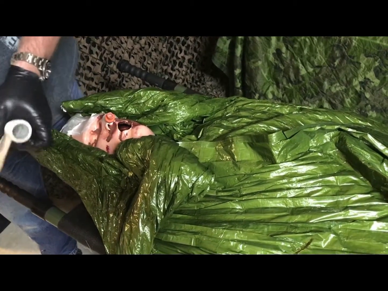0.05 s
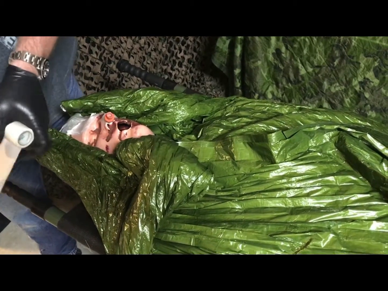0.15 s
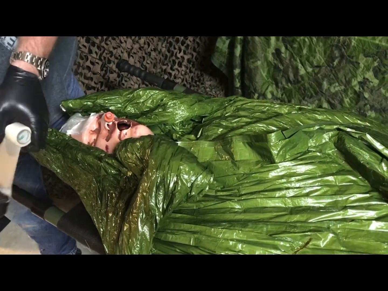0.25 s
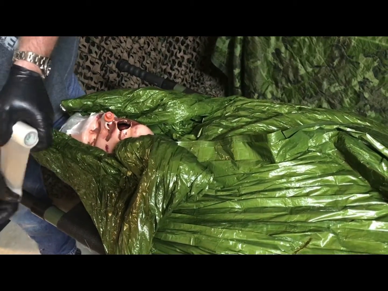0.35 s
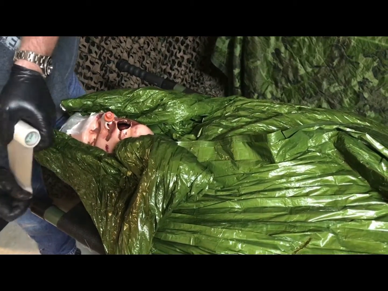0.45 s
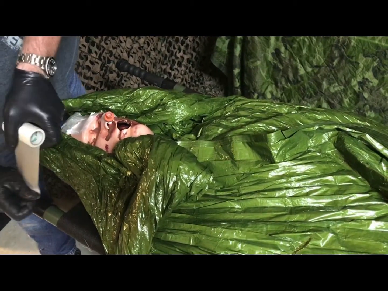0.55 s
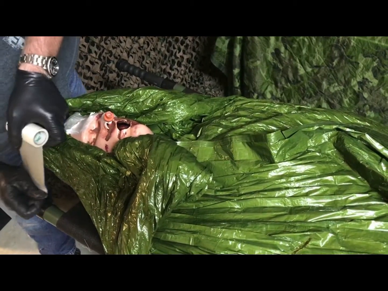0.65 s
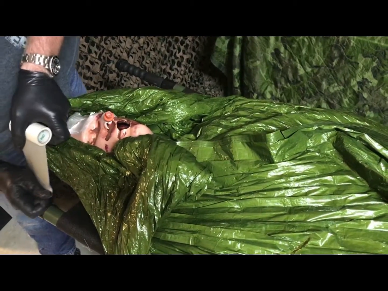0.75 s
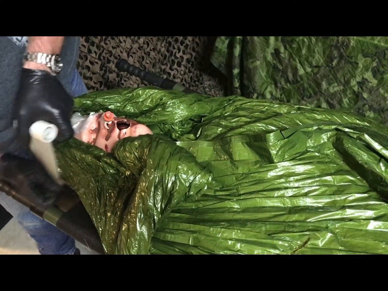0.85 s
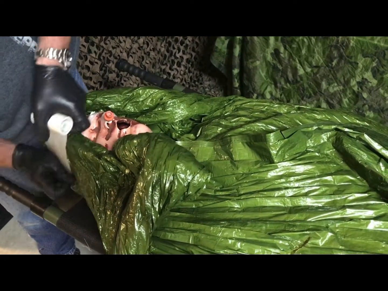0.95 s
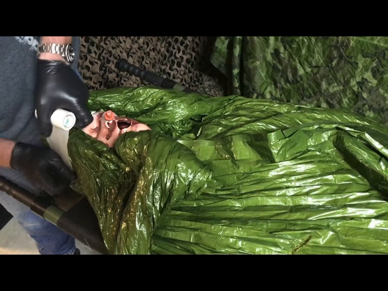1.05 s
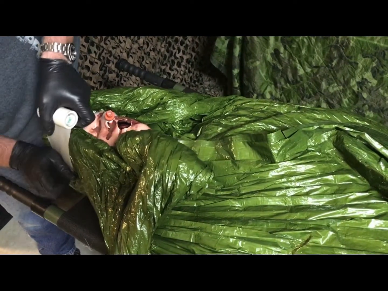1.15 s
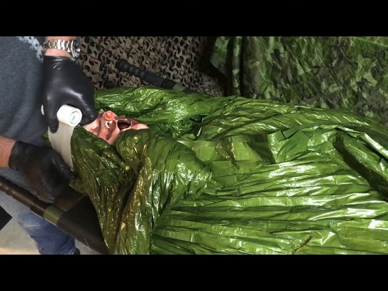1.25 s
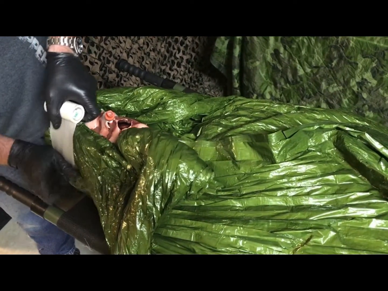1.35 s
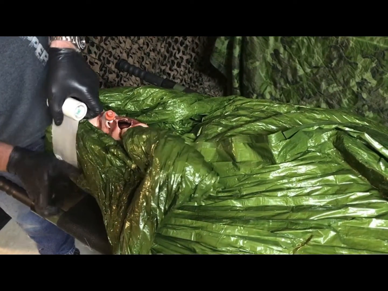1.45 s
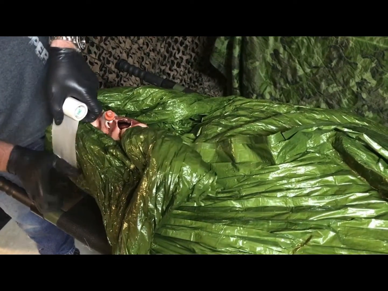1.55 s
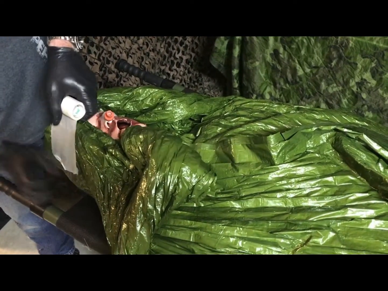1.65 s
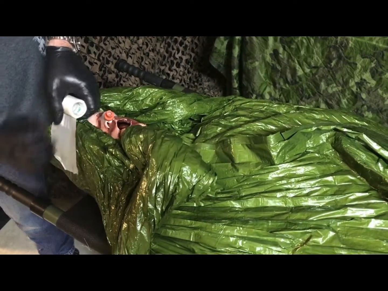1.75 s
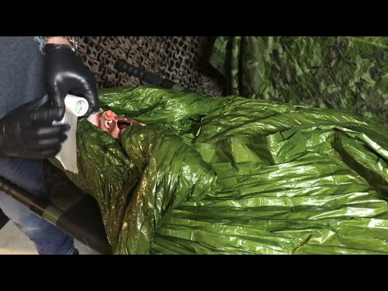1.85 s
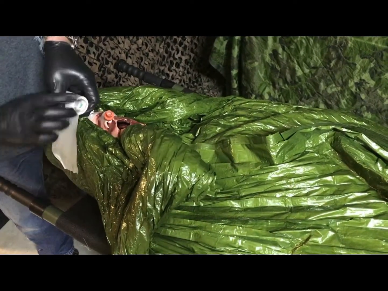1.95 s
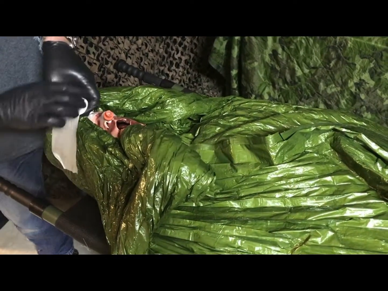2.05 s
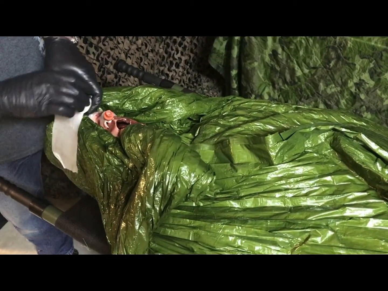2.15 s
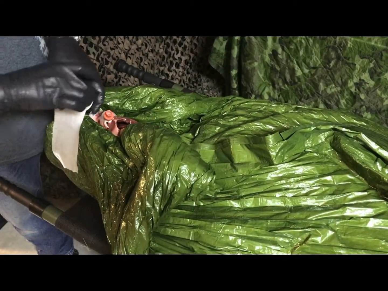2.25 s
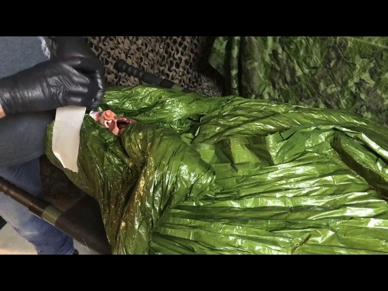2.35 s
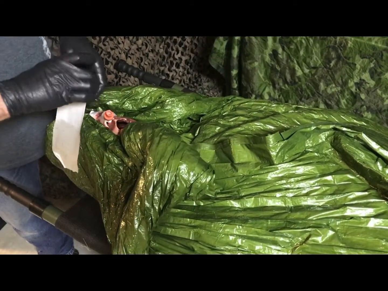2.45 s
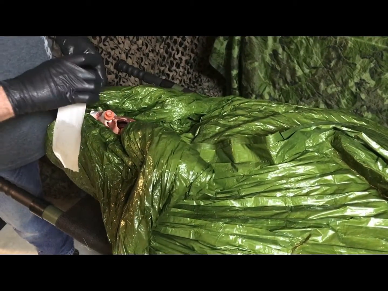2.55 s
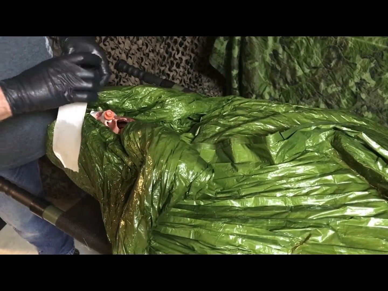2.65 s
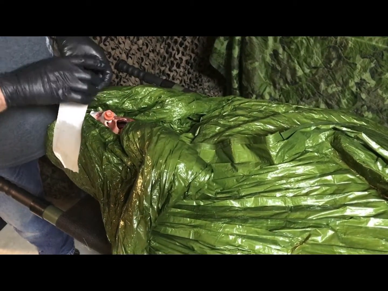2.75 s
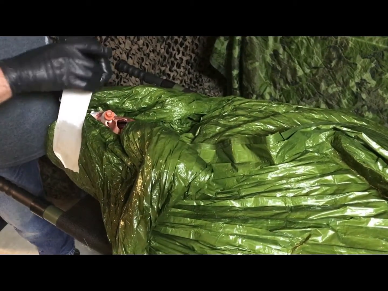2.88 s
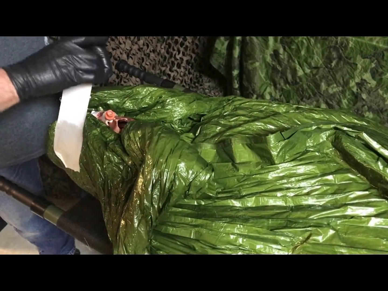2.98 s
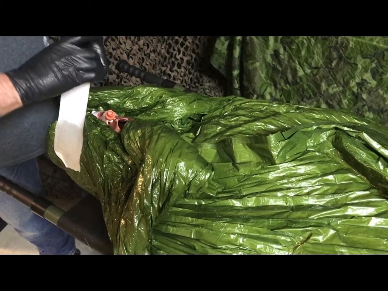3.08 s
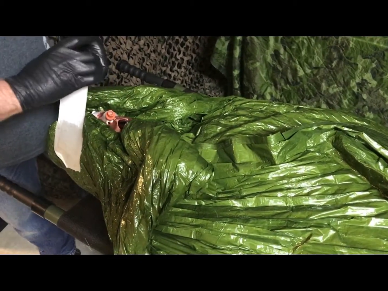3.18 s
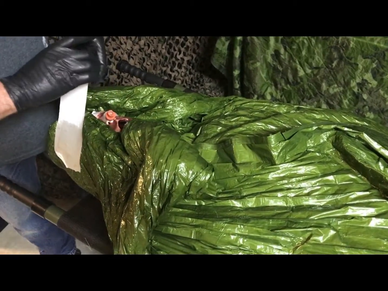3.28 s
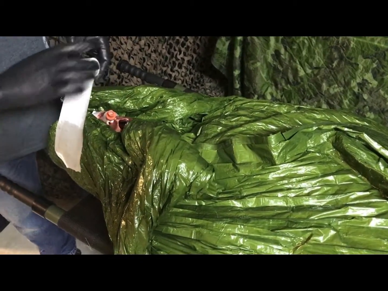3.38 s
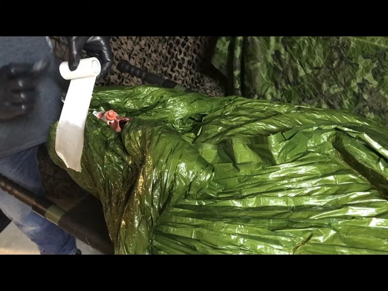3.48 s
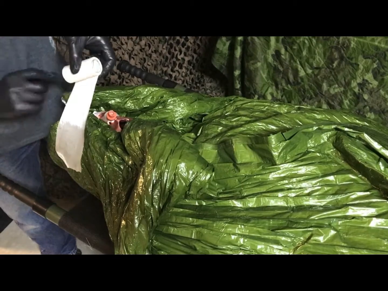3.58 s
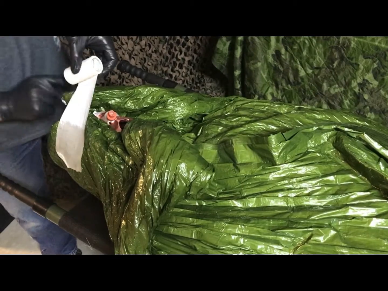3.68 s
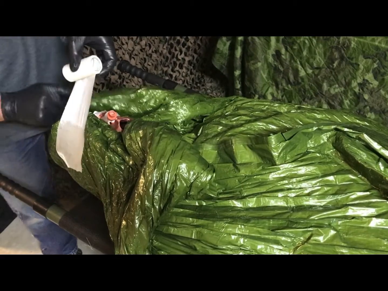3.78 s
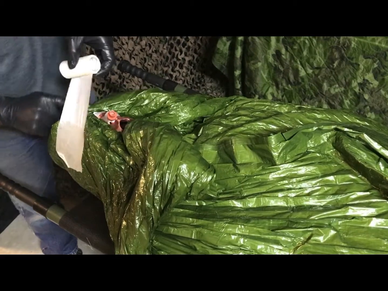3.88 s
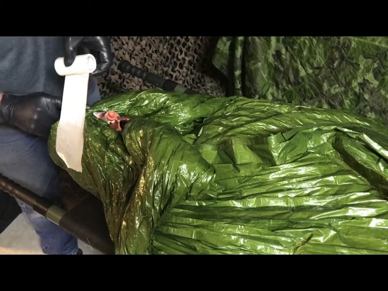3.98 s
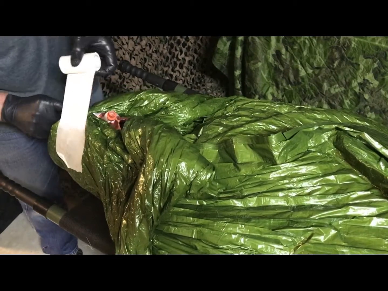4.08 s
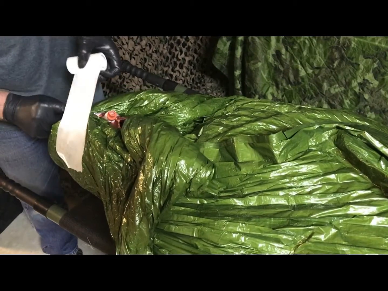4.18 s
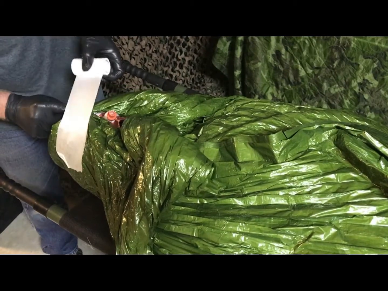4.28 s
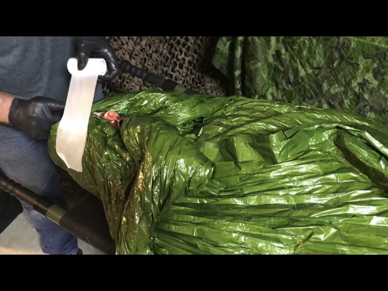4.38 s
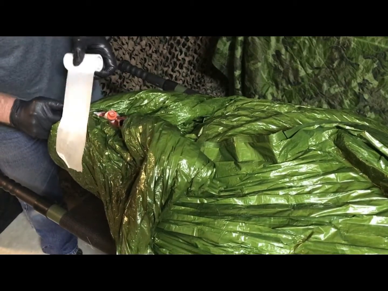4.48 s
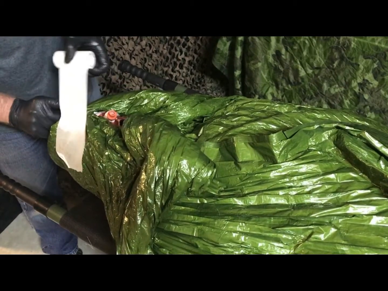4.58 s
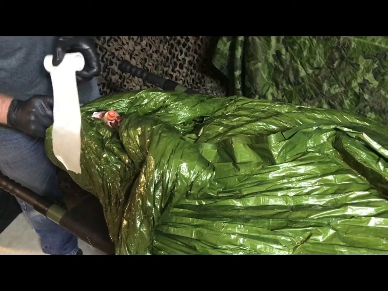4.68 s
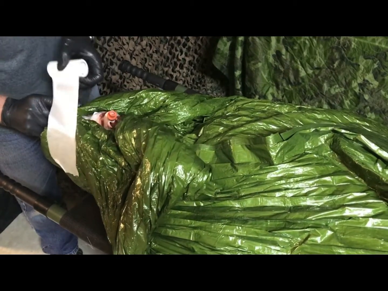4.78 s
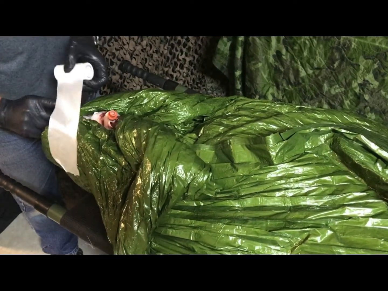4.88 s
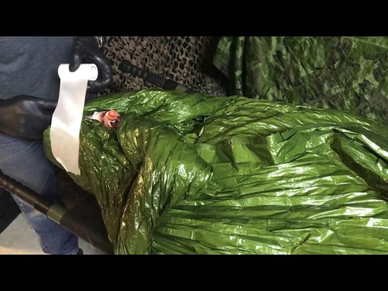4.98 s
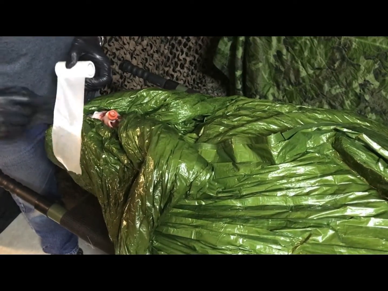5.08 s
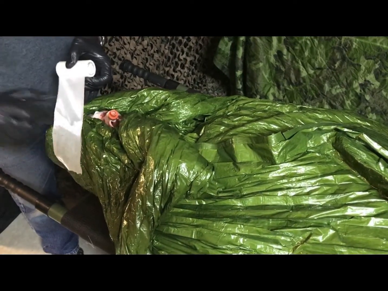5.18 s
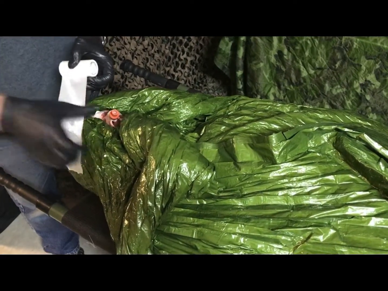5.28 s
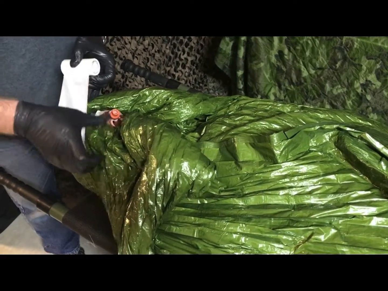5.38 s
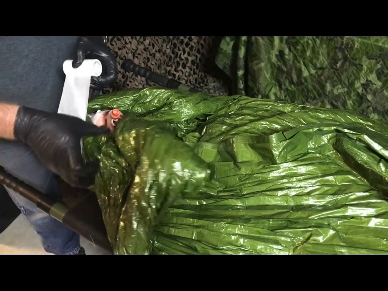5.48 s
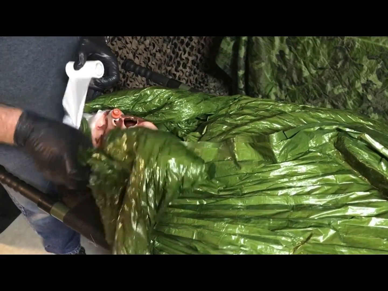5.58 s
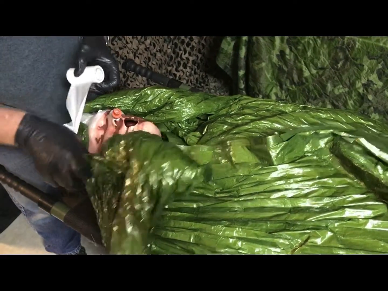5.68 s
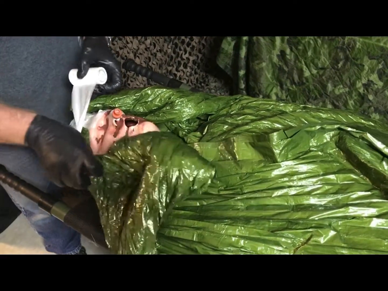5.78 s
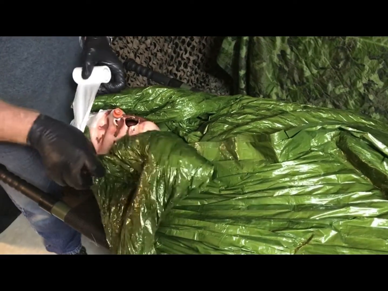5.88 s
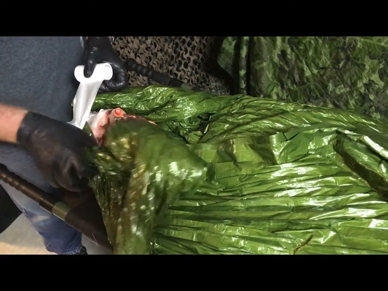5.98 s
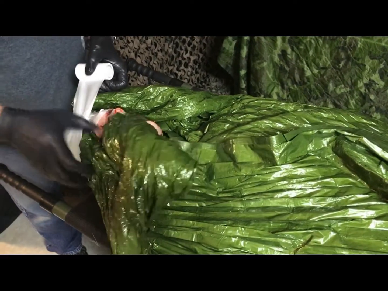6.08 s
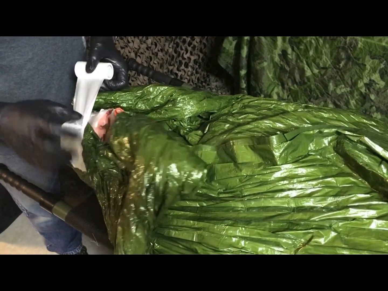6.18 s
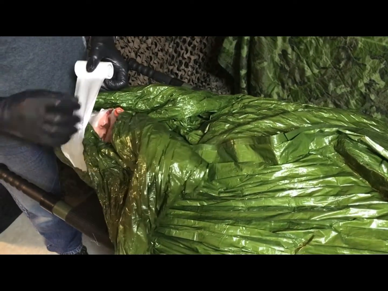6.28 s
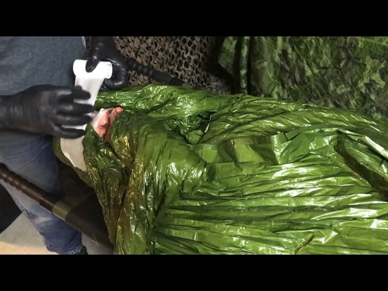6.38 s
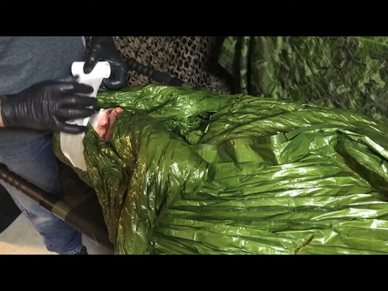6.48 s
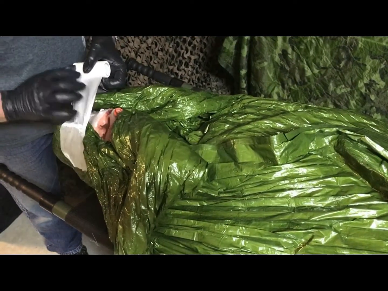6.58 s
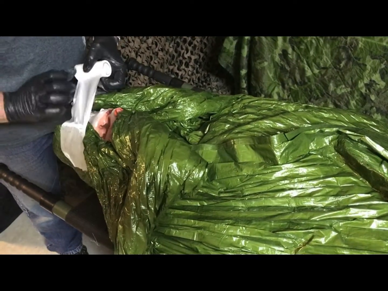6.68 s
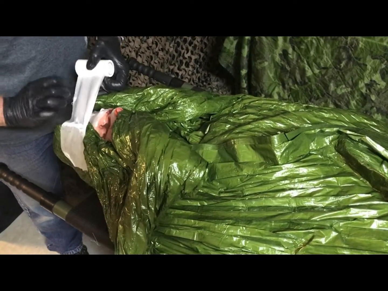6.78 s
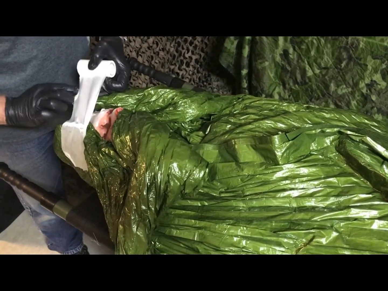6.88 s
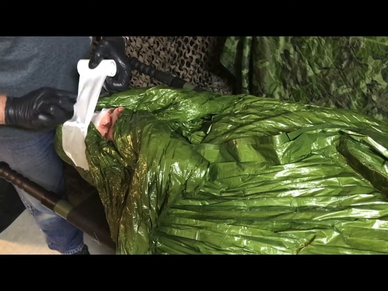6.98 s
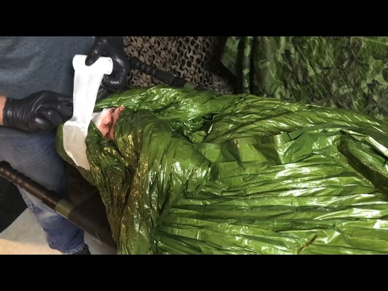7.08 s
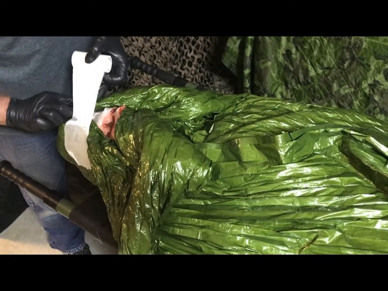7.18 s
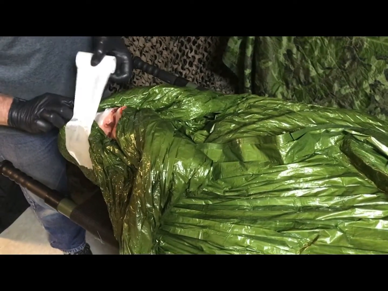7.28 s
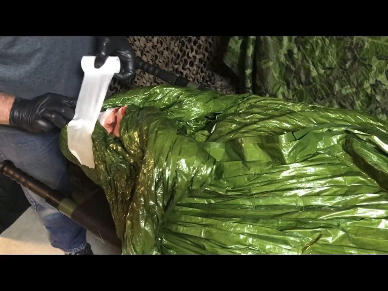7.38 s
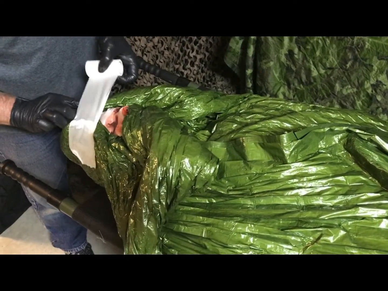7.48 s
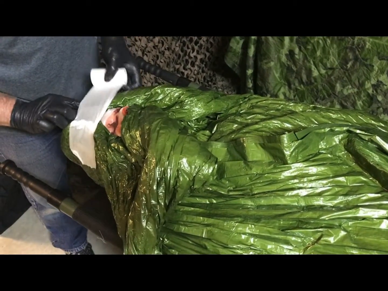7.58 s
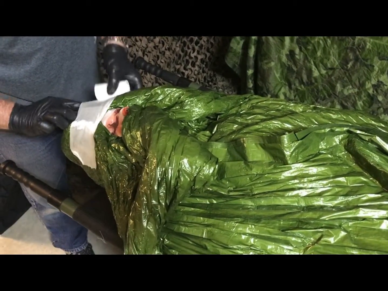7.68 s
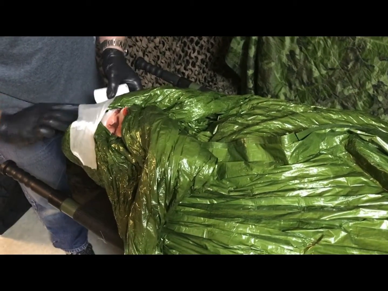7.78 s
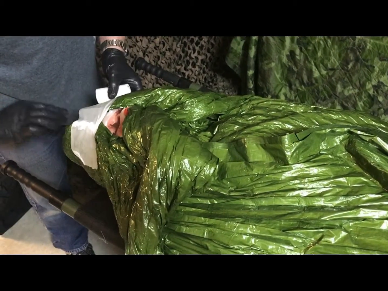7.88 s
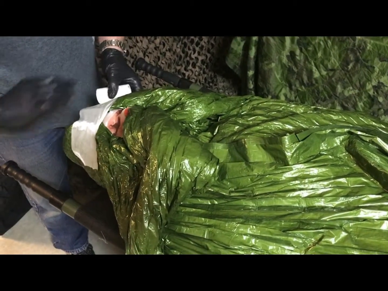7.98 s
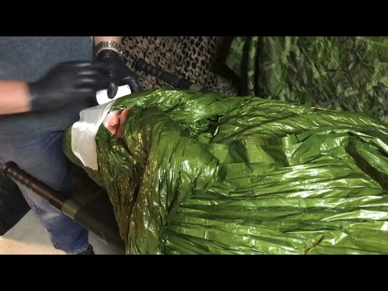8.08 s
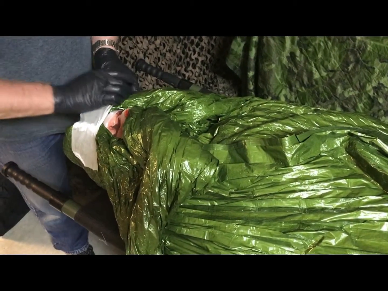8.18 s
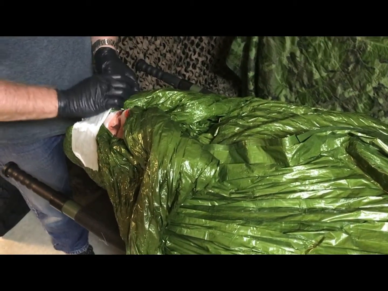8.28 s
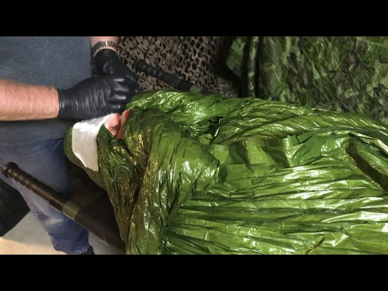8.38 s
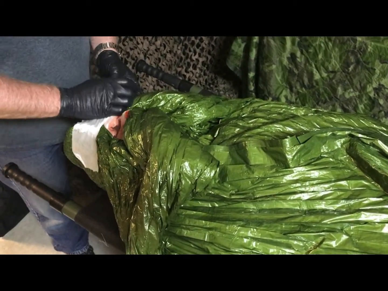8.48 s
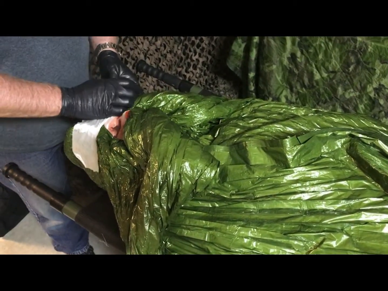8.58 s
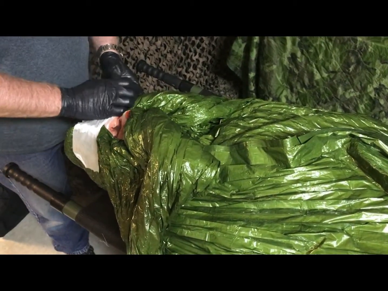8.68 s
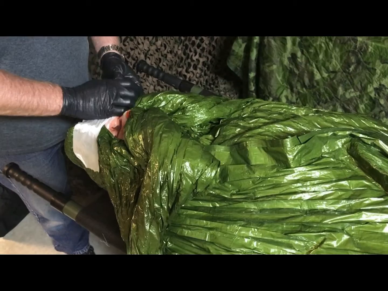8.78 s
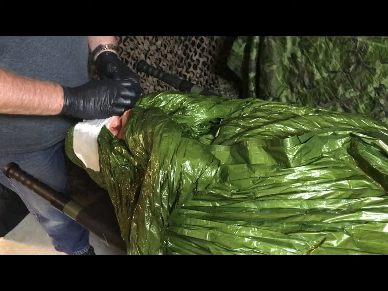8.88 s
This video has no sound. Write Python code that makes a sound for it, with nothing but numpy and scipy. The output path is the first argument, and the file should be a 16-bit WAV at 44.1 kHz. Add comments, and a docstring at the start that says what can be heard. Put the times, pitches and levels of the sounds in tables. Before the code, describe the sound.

Thin plastic sheeting crackles irregularly under gloved hands, recorded close with short indoor reflections. It starts almost quiet, bursts into bright snaps and a soft thump, then eases into small tugs and low glove squeaks. Midway, several panels pop loudly in quick succession. Heavier crinkling, skidding fingers and muffled table knocks come next, then one more hard pop and a sparse, gentle ending.

```python
"""A faint fizz of hands rubbing film opens the scene, with a small snap, then drags, tugs and louder snaps.
Gloved hands wind a bandage round a thin reflective plastic blanket on a training dummy, in a small room.
Random clicks make the fizz, ticks and duller fold rustle; ringing facets make crinkle and papery knocks.
Pulses make the snaps, gliding overtones the glove squeaks, resonant noise the finger skids and dull thumps.
Hollows under the film and the room's reflections ring on, over quiet air."""
import sys
import numpy as np
from scipy import signal
from scipy.fft import rfft, irfft
from scipy.io import wavfile

SR = 44100
rng = np.random.default_rng(int(sys.argv[2]) if len(sys.argv) > 2 else 0)


def output_pcm(signal):
    """Save a mono or channel-first signal as 16-bit PCM at the path in sys.argv[1].

    Samples are clipped to [-1, 1] before scaling.
    """
    pcm = np.clip(np.atleast_2d(signal).T, -1, 1) * 32767
    wavfile.write(sys.argv[1], SR, np.round(pcm).astype(np.int16))


N = 394247
TIME = np.arange(N) / SR

# Quiet air of the room, spectrum: (f/Hz, relative level/dB per Hz)
AIR_SPECTRUM = [(20, -24), (45, 2), (80, 9), (130, 2), (300, -6), (500, -18), (1500, -13.5), (5000, -11.5),
                (16000, -64)]
AIR_DB = -54.5
# Reverberation of the room: (f/Hz, decay by 60 dB t60/s)
ROOM_DECAY = [(100, 0.21), (500, 0.65), (1300, 0.5), (4000, 0.22), (14000, 0.056)]
# Colour of the microphone: (f/Hz, level/dB)
MIC_COLOUR = [(900, -2), (2800, 1.5), (3700, -1.5), (4800, -1), (5500, 2.5), (7000, 4), (7500, 2),
              (8300, 4), (9400, 1), (10400, -3), (11500, 2.5), (12800, 4.5), (14500, 2), (16000, -5)]
BAND_LIMIT_HZ = 16050
# Dull booms, from the dummy nudged on its table and from the air shoved aside by the loudest snapping panels:
# (t/s, boom level before its fades/dB, upper corner of the boom f/Hz)
THUMP_EVENTS = [(1.142, -43, 200), (1.452, -31, 75), (1.49, -34, 76), (1.694, -38, 90), (3.939, -37, 200),
                (4.411, -37, 200), (4.74, -33, 200), (4.901, -25, 236), (4.94, -35, 170),
                (5.793, -29.5, 203), (5.999, -31.5, 200), (6.19, -32, 150), (6.438, -48, 250),
                (6.949, -39, 150), (7.029, -35, 330), (7.089, -34, 300), (7.323, -29.5, 111),
                (7.858, -30, 140), (8.569, -44, 150)]
THUMP_T60_S = 0.15
# Resonances of the hollows under the wrapped film: (f/Hz, width/Hz, level/dB)
HOLLOW_MODES = [(188, 45, -10), (450, 25, -6), (634, 12, 0), (768, 30, -9), (1114, 16, -1), (1233, 20, -2),
                (1635, 25, -8), (1820, 35, -8)]
# Rubber sticks and slips: (t/s, length/s, level before the low cut/dB, first f/Hz, last f/Hz,
# fall per overtone/dB)
SQUEAK_EVENTS = [(.172, 0.025, -40.5, 352, 278, 2), (.403, 0.03, -44, 310, 316, 10),
                 (2.336, 0.11, -42.5, 150.7, 162.5, 0), (2.736, 0.13, -47, 282, 193, 32),
                 (2.905, .052, -29.5, 205, 178, 21), (2.938, 0.07, -41, 150.7, 141, 2.5),
                 (2.975, 0.127, -45.5, 215.6, 174, 10)]
# A finger skids over the film: (t/s, length/s, level/dB, centre f/Hz, width/Hz)
SKID_EVENTS = [(1.954, .016, -38.5, 2500, 700), (2.209, 0.037, -34.5, 2500, 900),
               (2.916, 0.051, -35, 666, 200), (3.81, 0.024, -35.5, 6000, 2500),
               (5.504, .03, -29.5, 1130, 600), (5.63, .055, -26.5, 1070, 600),
               (5.959, 0.023, -28.5, 1090, 300), (6.93, 0.024, -35.5, 2880, 1600),
               (7.199, 0.021, -36.5, 2140, 600), (7.763, 0.01, -28, 2030, 700),
               (7.765, .04, -30, 1180, 120), (7.823, 0.053, -27, 1390, 800)]
# Taut film flips over: (t/s, pop of the panel level/dB, crack of the crease level/dB);
# each level is the energy packed into a millisecond
SNAP_EVENTS = [(.0401, -38, -28), (0.362, -42, -28), (.715, -25.5, -31), (.8836, -38, -32),
               (.931, -43, -27), (.954, -32, -26), (1.142, -20, -24), (1.4105, -30, -23),
               (1.4278, -21.5, -20), (1.4495, -18.5, -6.5), (1.5542, -39, -22.5), (1.6173, -56, -26),
               (1.957, -32, -29), (2.0329, -28, -21.5), (2.844, -55, -31), (3.431, -38, -29.5),
               (3.5404, -30.5, -41), (3.648, -50, -37), (3.7336, -33, -37), (3.9358, -28.5, -24),
               (4.324, -39, -26), (4.3898, -20.5, -19), (4.403, -22, -26), (4.4104, -9.5, -14),
               (4.4275, -8, -19), (4.4443, -11.5, -17), (4.4627, -13, -18.5), (4.4872, -13, -23),
               (4.656, -16, -22.5), (4.7383, -21, -29), (4.892, -24, -24.5), (5.0404, -25, -30),
               (5.396, -38, -34), (5.4148, -40, -32), (5.5373, -23, -21), (5.541, -23, -17),
               (5.799, -25.5, -34), (6.0013, -25, -26), (6.1521, -25, -36), (6.1827, -20.5, -21),
               (6.1937, -19.5, -12.5), (6.4373, -22, -26), (6.4546, -22.5, -23), (6.9315, -37, -31),
               (7.029, -20.5, -23.5), (7.0906, -22, -20.5), (7.322, -27, -23.5), (7.384, -36, -28),
               (7.7645, -32, -23.5), (7.8616, -11, -11), (8.1218, -50, -30), (8.2284, -30, -27)]
PUSH_DB = -11.5  # the air that a panel shoves aside, relative to its pop
# Air shoved aside by a snapping panel, spectrum: (f/Hz, relative level/dB per Hz)
PUSH_SPECTRUM = [(25, -37), (80, -1), (170, 6.5), (350, 5), (600, -11), (2000, -72)]
# Pop of a snapping panel, spectrum: (f/Hz, relative level/dB per Hz)
POP_SPECTRUM = [(80, -61), (350, -7), (650, 4.5), (1200, 3), (1600, 0), (2400, -1.5), (3200, -17),
                (6000, -31), (14000, -58)]
# Crack of a breaking crease, spectrum: (f/Hz, relative level/dB per Hz)
CRACK_SPECTRUM = [(300, -67), (1800, 2.5), (3000, 8), (7000, 4.5), (10000, -0.5), (16000, 4)]
# Fizz of tiny creases, spectrum: (f/Hz, relative level/dB per Hz)
FIZZ_SPECTRUM = [(100, -20), (600, -4.5), (1800, 6.5), (3000, 7), (7000, 3), (12000, 0), (16000, 3.5)]
# Rustle of buckling folds, spectrum: (f/Hz, relative level/dB per Hz)
FOLD_SPECTRUM = [(30, -31), (80, -4.5), (160, -2), (300, 3), (480, -1.5), (640, 1), (1200, 7), (2000, 1),
                 (2900, -14), (4500, -6.5), (9000, -29)]
# The hands never quite leave the film, light rubbing: (t/s, drive level/dB)
TOUCH_CURVE = [(0, -45), (.22, -50), (.5, -55.5), (.64, -47.5), (.9, -50), (1.1, -36.5), (1.8, -43.5),
               (3.1, -42), (3.5, -50.5), (3.76, -51), (4, -42), (5.05, -42), (5.36, -52), (6.2, -42.5),
               (6.7, -44.5), (8.1, -45.5), (8.5, -41.5), (8.85, -49.5)]
TOUCH_FOLDS_DB = -3  # how hard this rubbing bends the film, relative to how hard it slides it
# A hand drags the film along: (start t/s, length/s, drive of the sliding fizz level/dB,
# drive of the bending folds level/dB)
DRAG_EVENTS = [(.125, .07, -45.5, -55), (.94, 0.15, -33, -34.5), (1.22, 0.16, -37, -52),
               (1.95, 0.13, -37, -42.5), (2.19, 0.45, -39, -41.5), (3.11, 0.069, -36, -41),
               (3.87, 0.091, -34.5, -36.5), (4.11, 0.32, -35.5, -40), (4.395, 0.1, -46, -26.5),
               (4.65, .08, -43, -34), (4.73, 0.1, -35, -30.5), (4.885, 0.055, -32.5, -26),
               (5.392, 0.75, -30, -35.5), (5.612, 0.071, -23.5, -32.5), (6.33, 0.27, -43.5, -66),
               (6.78, 0.075, -40.5, -57), (7.02, 0.25, -40, -38), (7.38, 0.14, -35, -41.5),
               (7.66, 0.13, -41, -44), (7.757, 0.14, -37, -33.5), (8.195, .1, -38.5, -37.5),
               (8.87, 0.15, -43.5, -43)]
DRAG_ATTACK_S, DRAG_RELEASE_S, DRAG_SAG_DB = 0.012, 0.045, -0.65
# A short tug bunches the film: (hardest pull t/s, drive of the fizz level/dB, drive of the folds level/dB)
TUG_EVENTS = [(.178, -43, -57), (.42, -43.5, -52), (.99, -23, -38), (1.425, -31.5, -51),
              (1.468, -24, -33.5), (1.69, -36.5, -35), (1.77, -41, -42), (1.89, -32.5, -40),
              (2.41, -48, -35.5), (2.56, -33.5, -37.5), (2.75, -53, -35.5), (2.93, -57, -28),
              (3.82, -29, -32.5), (5.05, -31, -25.5), (5.51, -28, -30.5), (5.8, -23, -25.5),
              (5.87, -29, -29.5), (5.998, -30.5, -25.5), (6.19, -33, -32), (6.458, -38.5, -32),
              (6.94, -36, -38), (7.1, -37, -42), (7.325, -34, -34.5), (7.835, -25, -30), (7.86, -28, -20.5),
              (8.575, -42, -39.5)]
TUG_RISE_S, TUG_FALL_S = 0.02, 0.033


def gain_of(db):
    """Converts decibels to amplitude."""
    return 10 ** (np.asarray(db) / 20)


def evened(x):
    """Scales to rms 1."""
    return x / np.sqrt(np.mean(x ** 2) + 1e-20)


def read(points, hz):
    """Reads a table on a logarithmic frequency axis."""
    f, value = np.transpose(points)
    return np.interp(np.log(hz + 1), np.log(f), value)


def add(mix, s, sound):
    """Mixes a sound in at time s."""
    part = mix[max(round(s * SR), 0):][:len(sound)]
    part += sound[:len(part)]


def colour(x, points, size=2048):
    """Causal filter with the given spectrum, so that clicks keep their sharp fronts."""
    hz = abs(np.fft.fftfreq(size, 1 / SR))
    log_gain = np.log(gain_of(read(points, hz)))
    # the Hilbert transform of the log gain supplies the minimum phase
    taps = np.fft.ifft(np.exp(np.conj(signal.hilbert(log_gain)))).real
    return signal.oaconvolve(x, taps[:size // 2])[:len(x)]


def low_cut(x, hz):
    """Second-order high-pass."""
    return signal.sosfilt(signal.butter(2, hz, "highpass", fs=SR, output="sos"), x)


def wander(per_s, size=N):
    """Smooth chance of rms 1, whose movement thins out above per_s times a second."""
    hz = np.fft.rfftfreq(size, 1 / SR)
    spectrum = rfft(rng.standard_normal(size)) / (1 + (hz / per_s) ** 2)
    return evened(irfft(spectrum, size))


def clicks(per_s, spread_db, limit=6.1):
    """Random clicks of either sign: many small, a few large, up to limit times spread_db."""
    size = gain_of(spread_db * np.minimum(rng.exponential(1, N), limit))
    happens = rng.random(N) < per_s / SR
    return size * rng.choice([-1, 1], N) * happens


def room_air():
    """Steady noise, shaped to the quiet air of the room."""
    return gain_of(AIR_DB) * evened(colour(rng.standard_normal(N), AIR_SPECTRUM))


def room(x, body_db, treble_db, delay_s=0.0028):
    """Dense reflections that die sooner, and are weaker, in the treble."""
    t = np.arange(SR // 2) / SR
    hz, at, noise = signal.stft(rng.standard_normal(len(t)), SR, nperseg=256)
    t60 = read(ROOM_DECAY, hz)[:, None]
    wet = gain_of(read([(2000, body_db), (6000, treble_db)], hz))[:, None]
    # the root keeps the energy independent of the decay time
    decay = np.exp(-np.log(1000) * at / t60) * np.sqrt(2 * np.log(1000) / (t60 * SR))
    tail = signal.istft(noise * wet * decay, SR, nperseg=256)[1][:len(t)]
    return signal.oaconvolve(x, tail * (t > delay_s))[:N]


def thumps(size=16384):
    """A soft push shakes the dummy and its table, or a loud panel shoves the air aside: a dull boom that soon
    dies."""
    t, hz, out = np.arange(size) / SR, np.fft.rfftfreq(size, 1 / SR), np.zeros(N)
    fade = np.minimum(t / 0.0019, 1) * np.exp(-np.log(1000) * t / THUMP_T60_S)
    for s, db, top_hz in THUMP_EVENTS:
        ratio = hz / top_hz
        spectrum = rfft(rng.standard_normal(size)) * ratio ** 4 / (1 + ratio ** 2) ** 5
        add(out, s, gain_of(db) * evened(irfft(spectrum)) * fade)
    return out


def hollows(x):
    """The air pockets under the film ring on after each impulse."""
    out = np.zeros(N)
    for hz, width_hz, db in HOLLOW_MODES:
        r = np.exp(-np.pi * width_hz / SR)
        pole = r * np.exp(2j * np.pi * hz / SR)
        out += 2 * gain_of(db) * signal.lfilter([1 - r], [1, -pole], x).real
    return out


def squeaks(jitter=0.109, unevenness_db=2.5, lowest_hz=120, count=5):
    """A few uneven stick-slip cycles of a rubber glove, gliding in pitch."""
    out = np.zeros(N)
    for s, length, db, first_hz, last_hz, fall_db in SQUEAK_EVENTS:
        n = int(length * SR)
        pitch_hz = np.linspace(first_hz, last_hz, n) * (1 + jitter * wander(180, size=16384)[:n])
        turns = np.cumsum(pitch_hz) / SR
        tone = np.zeros(n)
        for k in range(count):
            tone += gain_of(-fall_db * k) * np.sin(2 * np.pi * (k + 1) * turns) / np.sqrt(k + 1)
        grip = gain_of(unevenness_db * wander(77, size=16384)[:n])
        add(out, s, gain_of(db) * evened(tone * grip * signal.windows.tukey(n, .8)))
    return low_cut(out, lowest_hz)


def skids(size=8192):
    """Rapid irregular slips ring one stretched patch of film, strongest as the finger breaks loose."""
    out, hz = np.zeros(N), np.fft.rfftfreq(size, 1 / SR)
    for s, length, db, centre_hz, width_hz in SKID_EVENTS:
        n = int(length * SR)
        resonance = 1 / (1 + (2 * (hz - centre_hz) / width_hz) ** 2)
        ring = irfft(rfft(rng.standard_normal(size)) * resonance)
        # the taut patch limits its own swing, which evens out the ring
        ring = ring / np.sqrt(abs(signal.hilbert(ring)))
        u = np.arange(n) / n
        swell = np.minimum(u / 0.15, 1) * (1 - u ** 2)
        add(out, s, gain_of(db) * evened(ring[:n] * swell))
    return out


def snaps(flutter=0.073, flutter_s=0.0041, crack_s=0.00085, usual_db=-25, growth=0.42, size=2048):
    """A panel flips with a pulse and brief flutter; its crease breaks in tiny steps: the louder, the longer."""
    t, out = np.arange(size) / SR, np.zeros(N)
    millisecond = SR / 1000  # in samples
    for s, pop_db, crack_db in SNAP_EVENTS:
        pulse = (t == 0) + flutter * rng.standard_normal(size) * np.exp(-t / flutter_s)
        fade_s = crack_s * gain_of(growth * (crack_db - usual_db))
        steps = rng.choice([-1, 1], size) * np.exp(-t / fade_s)
        layers = ((pulse, PUSH_SPECTRUM, pop_db + PUSH_DB), (pulse, POP_SPECTRUM, pop_db),
                  (steps, CRACK_SPECTRUM, crack_db))
        for drive, spectrum, db in layers:
            part = colour(drive, spectrum)
            add(out, s, gain_of(db) * np.sqrt(millisecond) * part / np.linalg.norm(part))
    return out


def drag(start, length):
    """A drag gets going, eases a little as it runs, and dies away when the hand stops."""
    t = TIME - start
    held = np.clip(t / DRAG_ATTACK_S, 0, 1) * gain_of(DRAG_SAG_DB * np.clip(t / length, 0, 1))
    return held * np.exp(-np.maximum(t - length, 0) / DRAG_RELEASE_S)


def tug(s):
    """A tug builds quickly to its hardest pull, then the film settles."""
    t = TIME - s
    return np.exp(-np.maximum(-t / TUG_RISE_S, t / TUG_FALL_S))


def effort():
    """Touch, drags and tugs add in power: how hard the film slides and how hard it bends, in dB."""
    touch = gain_of(np.interp(TIME, *np.transpose(TOUCH_CURVE)))
    slide, bend = touch ** 2, (touch * gain_of(TOUCH_FOLDS_DB)) ** 2
    for table, envelope in ((DRAG_EVENTS, drag), (TUG_EVENTS, tug)):
        for *timing, fizz_db, folds_db in table:
            power = np.maximum(envelope(*timing), 1e-9) ** 2
            slide = slide + power * gain_of(fizz_db) ** 2
            bend = bend + power * gain_of(folds_db) ** 2
    return 10 * np.log10(slide), 10 * np.log10(bend)


def facets(per_s, spread_db, low_hz, high_hz, cycles, count=24, size=1024):
    """Facets of film flip at random, each ringing for a few cycles at the pitch of its size."""
    t, out = np.arange(size) / SR, np.zeros(N)
    for hz in np.geomspace(low_hz, high_hz, count):
        ring = np.sin(2 * np.pi * hz * t) * np.exp(-t * hz / cycles)
        flips = clicks(per_s / count, spread_db, limit=4.27)
        out += signal.oaconvolve(flips, ring / np.linalg.norm(ring))[:N]
    return out


def panels(bend_db, level_db=-7):
    """Wide taut panels ring lower and longer than creases, with a papery knock."""
    knocks = facets(220, spread_db=4, low_hz=551.5, high_hz=2500, cycles=5.8, count=28)
    return gain_of(bend_db + level_db) * evened(knocks)


def ticks(slide_db, level_db=-44, usual_db=-40, per_s=200, rate_follow=.3, size_follow=0.5):
    """Single creases stand out; faster handling makes them more frequent and louder."""
    speed = gain_of(slide_db - usual_db)
    creases = facets(per_s * speed ** rate_follow, spread_db=3.0, low_hz=1880, high_hz=13900, cycles=1.63)
    return gain_of(level_db) * evened(speed ** size_follow * creases)


def avalanches(per_s=70, fade_s=0.0043):
    """Chance of rms 1 that jumps when a crease sets off its neighbours, and fades quickly."""
    kicks = rng.exponential(1, N) * (rng.random(N) < per_s / SR)
    power = signal.lfilter([1], [1, -np.exp(-2 / (fade_s * SR))], kicks)
    swell = np.sqrt(power + 1e-12)
    return evened(swell - swell.mean())


def rustle(slide_db, bend_db, fizz_db=-2.0, crinkle_db=-7, folds_db=-4.0,
           fizz_clump_db=1.57, folds_clump_db=2.15, shared=0.23, burst_share=0.66):
    """Creases give way in small avalanches; folds buckle partly on the same clicks as the creases."""
    clumps = evened(wander(64) + burst_share * avalanches())
    creases = evened(clicks(12000, 2.8))
    buckles = np.sqrt(shared) * creases + np.sqrt(1 - shared) * evened(clicks(2000, 3.1))
    fizz = evened(colour(creases, FIZZ_SPECTRUM))
    crinkle = evened(facets(2500, spread_db=2.0, low_hz=1440, high_hz=15240, cycles=2.9))
    fine = gain_of(fizz_db) * fizz + gain_of(crinkle_db) * crinkle
    folds = evened(colour(buckles * gain_of(folds_clump_db * clumps), FOLD_SPECTRUM))
    return fine * gain_of(slide_db + fizz_clump_db * clumps) + folds * gain_of(bend_db + folds_db)


def scene(film_hollow_db=-4, snap_hollow_db=2):
    """The blanket and the gloves, the hollows they ring, their reflections, and the quiet air of the room."""
    slide_db, bend_db = effort()
    film = rustle(slide_db, bend_db) + ticks(slide_db) + panels(bend_db)
    pops = snaps()
    accents = pops + squeaks() + skids()
    ringing = hollows(gain_of(film_hollow_db) * film + gain_of(snap_hollow_db) * pops)
    film_room = room(film, body_db=-8.0, treble_db=-17.0)
    accent_room = room(accents, body_db=-5.5, treble_db=-10.5)
    return (room_air() + film_room + accent_room + thumps() + ringing + accents + film)[None]


def record(dry, low_cut_hz=38):
    """Microphone colour and low cut, then the band limit."""
    low_pass = signal.firwin(511, BAND_LIMIT_HZ, window=("kaiser", 10), fs=SR)
    heard = low_cut(colour(dry[0], MIC_COLOUR), low_cut_hz)
    return signal.oaconvolve(heard, low_pass, "same")[None]


dry = scene()
out = record(dry)
output_pcm(out)
```